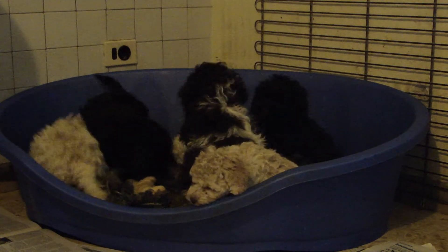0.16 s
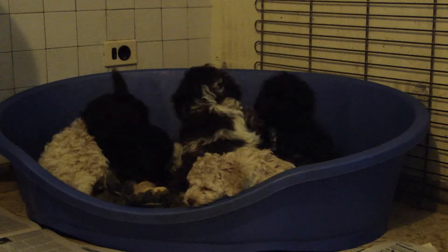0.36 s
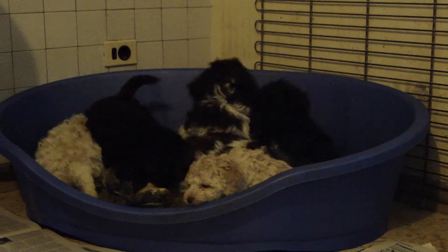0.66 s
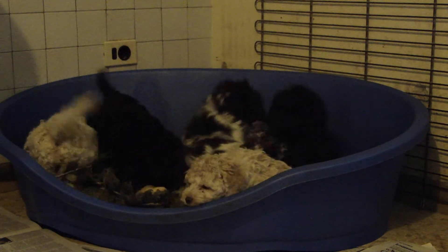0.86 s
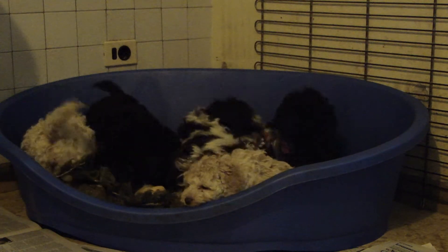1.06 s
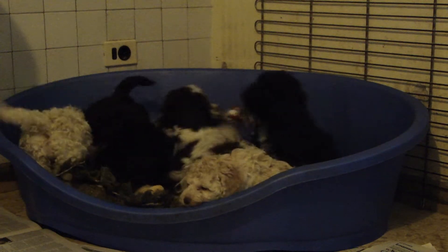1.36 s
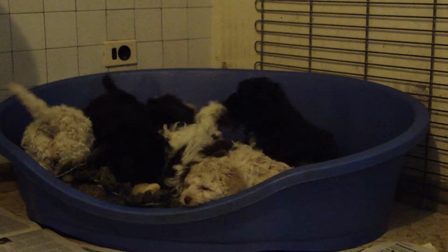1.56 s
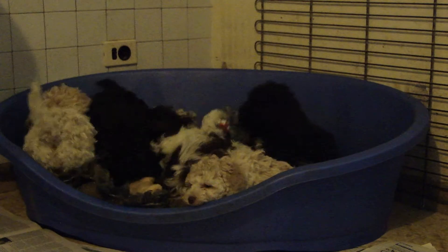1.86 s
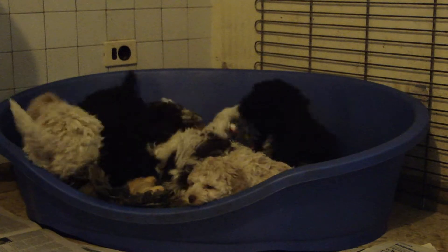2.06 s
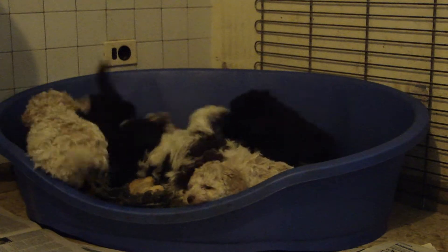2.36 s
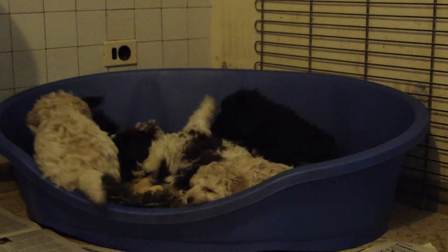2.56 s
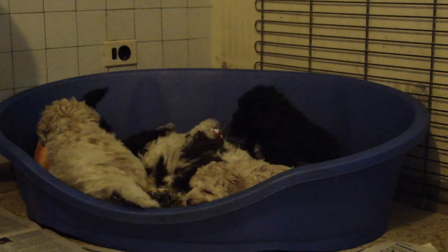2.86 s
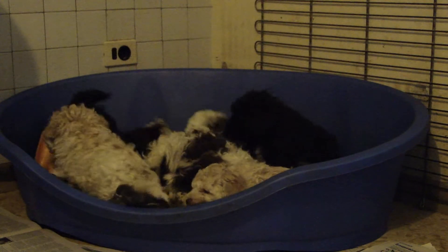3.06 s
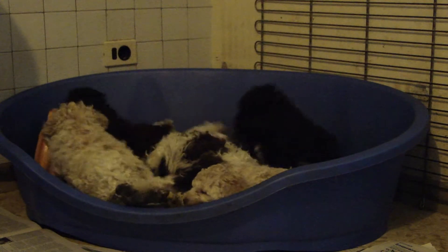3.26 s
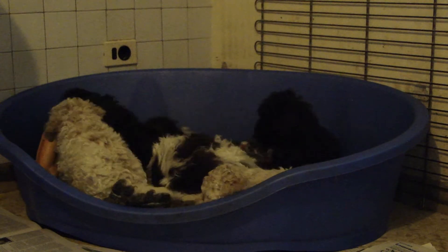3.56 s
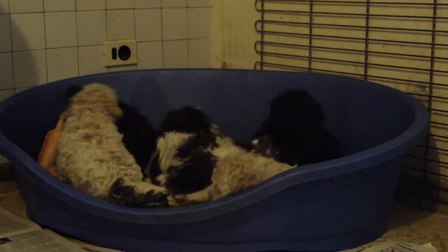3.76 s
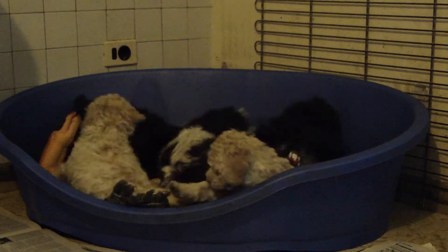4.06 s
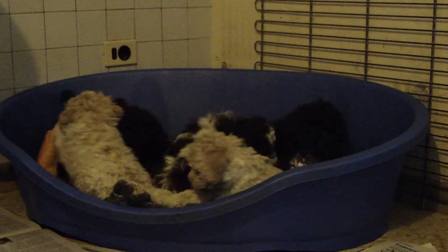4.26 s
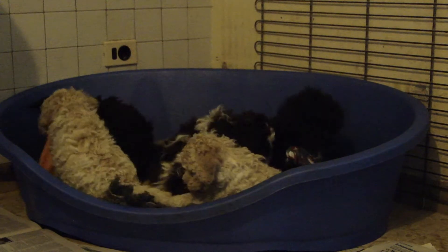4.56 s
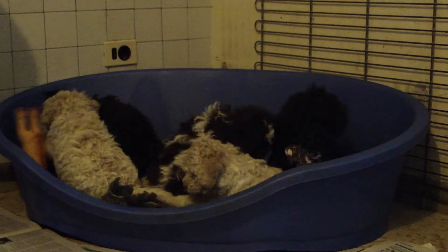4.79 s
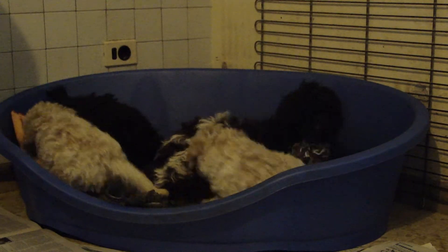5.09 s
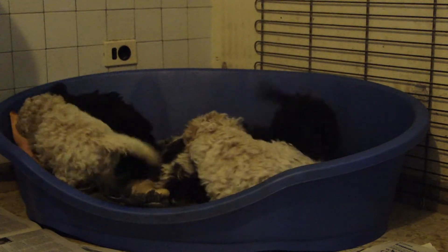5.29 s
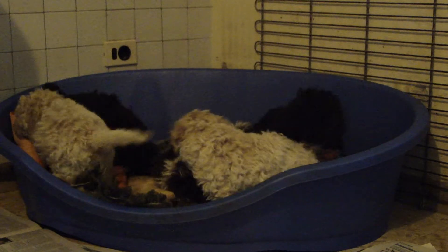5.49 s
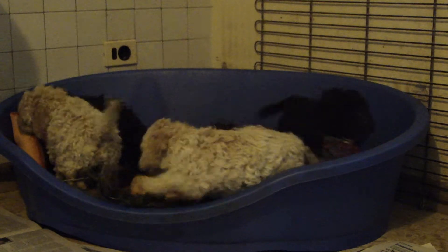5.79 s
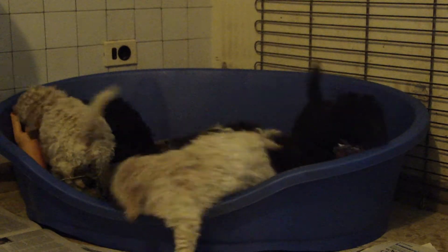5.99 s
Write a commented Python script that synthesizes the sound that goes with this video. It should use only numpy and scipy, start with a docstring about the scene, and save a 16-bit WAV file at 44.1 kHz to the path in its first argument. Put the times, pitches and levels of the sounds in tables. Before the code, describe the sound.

Puppies scuffle in a plastic bed in a small tiled room. At first a paw rakes the tub again and again, with hollow knocks and scratching claws. The scrabbling then eases into lighter shoving, rustling bedding and short snorts, with a couple of faint squeaks. Near the end come thin whimpers and more bumps and claw taps. The microphone sounds fairly near, with a short echo and soft hiss.

```python
"""A small tiled room, puppies scuffling in a plastic tub. A paw rakes the tub again and again, then the
litter shoves about. Slipping pads and knocks ring the tub's modes; claws scratch and tap the rim.
Noses snort among slower rustling swishes; throat whistles give two-toned squeaks and thin whimpers.
Under it: rustling bedding, a faint moan, a short tile echo and the room's hush."""
import sys
import numpy as np
from scipy import signal
from scipy.fft import rfft, irfft, next_fast_len
from scipy.io import wavfile
from scipy.ndimage import uniform_filter1d

SR = 44100
rng = np.random.default_rng(int(sys.argv[2]) if len(sys.argv) > 2 else 0)


def transcribe(u):
    """Save the signal u as a 16-bit wav file named by the first command-line argument.

    u: samples, shape (n,) or (channels, n), limited to [-1, 1]; the rate is SR.
    q: integer samples, one column per channel.
    """
    v = np.clip(np.atleast_2d(u).T, -1, 1)
    q = np.round(v * 32767).astype(np.int16)
    wavfile.write(sys.argv[1], SR, q)


N = 270505
T = np.arange(N) / SR

# Tub modes. Each row: frequency in Hz, width in Hz before the litter's damping, gain in dB.
TUB_MODES = [(204.4, 54, -0.5), (265.3, 30, -5.5), (294, 61, 0), (340.4, 45, 2.5), (406, 47, -6),
             (438.4, 21, -2.5), (502, 113, -3), (540.8, 15.2, -3.5), (595, 9, -2), (645, 24, 0),
             (690, 29, 0.5), (754, 17, 0), (842, 45, -8), (974, 36, 3.5), (1103, 21, -16), (1238, 12, -6),
             (1515, 112.8, -23), (1650, 120, -14.5), (2006.3, 26, -9.5), (2350, 110, -21),
             (2800, 120, -34.5)]


def paw_rakes():
    """Slipping pads shake the tub; a harder contact, or one after a rest, drives the upper modes more."""
    # Each row: time in seconds, level in dB, hold in seconds.
    contacts = [(.009, -23, 0.064), (.089, -29.5, 0.0357), (0.288, -31, 0.075), (0.386, -19, 0.05),
                (.449, -27, 0.01496), (.499, -44.5, 0.094), (0.691, -32.5, 0.034), (0.809, -20, 0.03),
                (.896, -29, 0.038), (1.063, -26.5, 0.015), (1.167, -20.5, 0.037), (1.21, -22, 0.02826),
                (1.249, -27.5, 0.017), (1.3, -44, 0.0255), (1.399, -39, 0.026), (1.459, -36, 0.00484),
                (1.558, -19.5, 0.007), (1.599, -22, 0.028), (1.634, -29, 0.037), (1.689, -44, 0.12),
                (1.837, -37, 0.0437), (1.917, -36, 0.0055), (1.996, -20, 0.0045), (2.047, -23, 0.03477),
                (2.111, -25.5, 0.014), (2.199, -35, 0.0087), (2.267, -35.5, 0.011), (2.324, -34.5, 0.04073),
                (2.446, -22, 0.017), (2.505, -25, 0.059), (2.564, -43, 0.1), (2.875, -52, 0.023),
                (3.054, -46.5, 0.04014), (3.152, -35, 0.021), (3.189, -49.5, 0.073),
                (3.309, -43.5, 0.01248), (3.38, -42.5, 0.016), (4.718, -57, 0.058), (4.838, -33, 0.019),
                (4.919, -48, 0.06865), (5.864, -39, 0.0076), (5.929, -41, 0.027), (5.987, -53, 0.0193)]
    # Weight shifting on the tub floor. Each row: time in seconds, level in dB.
    shifting = [(0.0, -21), (0.13, -41), (0.68, -47), (1.04, -35), (1.59, -43), (2.49, -52), (2.68, -83),
                (3.93, -53.5), (4.301, -65.5), (5.84, -54), (6.13, -45)]
    rise_s, upper_rise_s, bass_lag_s = 0.012494, 0.0033, 0.0022
    full_rest_s, hard_db = 0.043, -22
    lead_s = rise_s - upper_rise_s
    low_power = level_curve(shifting) ** 2
    high_power = low_power * amp(-14) ** 2
    rests_s = np.diff([row[0] for row in contacts], prepend=-1)
    for (at_s, db, hold_s), rest_s in zip(contacts, rests_s):
        upper_db = -13 + 4.5 * min(rest_s / full_rest_s, 1) + (db - hard_db)
        add(low_power, *stroke(at_s + bass_lag_s, db, rise_s + bass_lag_s, hold_s, t60_s=0.22))
        add(high_power, *stroke(at_s - lead_s, db + upper_db, upper_rise_s, hold_s + lead_s, t60_s=0.2))
    force = slips(per_s=600, spread_db=2.5, smooth=.4)
    low = ring(force * np.sqrt(low_power), TUB_MODES[:8])
    return low + ring(force * np.sqrt(high_power), TUB_MODES[7:])


def wall_knocks():
    """Short pushes ring the tub; a harder contact favours higher modes."""
    # Each row: time in seconds, push in dB, hardness in Hz.
    blows = [(0.383, -13.5, 899), (.69, -5.5, 592.4), (.799, 3, 902), (.9, 5.5, 770), (1.057, -5, 695),
             (1.156, -4, 799.5), (1.184, 10, 700), (1.36, -6.5, 800), (1.461, -4, 599.8), (1.55, 3, 898),
             (1.633, 6, 699), (1.985, 4.5, 902), (2.011, 7.5, 610), (2.116, 2.5, 593), (2.269, -16, 700),
             (2.32, -10.5, 492), (2.44, -3, 880), (2.881, -15, 701), (3.054, -16.5, 443),
             (3.145, -10, 601.2), (3.373, -23, 600), (4.549, -21, 810), (4.831, -5.5, 700),
             (5.152, -1, 600), (5.162, -7, 900), (5.525, -19, 1225), (5.545, -33, 1201), (6.085, -14, 1190)]
    force, t = np.zeros(N), np.arange(600) / SR
    for at_s, db, hz in blows:
        push = np.diff(t ** 2 * np.exp(-4 * hz * t), 2)
        add(force, round((at_s - .002) * SR), amp(db) * push / abs(rfft(push, 2048)).max())
    return ring(force, TUB_MODES)


def thuds():
    """A bump rings one patch of the tub: two fast-dying modes that sag in pitch."""
    # Each row: start in seconds, level in dB, pitch in Hz.
    bumps = [(1.92, -26, 545), (4.078, -37, 506.4), (4.104, -41, 504), (4.201, -43, 161),
             (4.548, -45.5, 748), (4.552, -46, 2170), (4.829, -30.5, 517), (4.852, -30, 578),
             (4.87, -36, 538), (4.925, -37, 503), (5.157, -22, 817), (5.173, -30, 733), (5.186, -33, 775),
             (5.201, -32, 519), (5.391, -37.5, 998.1), (5.528, -32, 790), (5.53, -31.5, 1593),
             (5.663, -38, 575), (5.751, -38.5, 1434), (5.862, -30, 390.4), (5.873, -31.5, 209),
             (5.877, -42, 2310), (5.986, -29.5, 209), (6.041, -39.5, 178)]
    # Each row: frequency ratio, gain in dB.
    patch_modes = [(1., 4), (1.15, -6.5)]
    rise_s, t60_s = 0.0031, 0.08
    out, t = np.zeros(N), np.arange(SR // 6) / SR
    for start_s, db, hz in bumps:
        phase = 2 * np.pi * hz * t * (1 - 0.83 * t)
        pair = sum(amp(mode_db) * np.sin(ratio * phase) for ratio, mode_db in patch_modes)
        add(out, round(start_s * SR), amp(db - 60 * t / t60_s) * pair * ramp(t, rise_s))
    return out


def claw_scratches():
    """A claw slips over the rim: a run of ticks through one broad resonance."""
    # Each row: time in seconds, level in dB, resonance in Hz.
    scratches = [(.0094, -30.5, 1194), (0.383, -29, 1090), (0.69, -38.5, 1397), (0.748, -37, 1500),
                 (0.799, -27, 988.8), (0.9, -28.5, 1360), (.9324, -46, 1488), (1.163, -38, 1850),
                 (1.2485, -38, 1014), (1.556, -40, 1080), (1.631, -36, 1097), (1.993, -34.5, 1090),
                 (2.0686, -40, 985), (2.444, -30.5, 890), (2.5635, -42, 1117), (3.998, -44, 1590),
                 (4.203, -52, 900), (4.551, -48, 1120), (4.7195, -48.5, 600), (4.76, -50, 700),
                 (5.153, -49, 940), (5.299, -39.5, 880), (5.341, -38, 1420), (5.379, -41.5, 1779),
                 (5.521, -33, 1060), (5.611, -40, 1400), (5.6594, -62, 1378), (5.8743, -46.5, 2400),
                 (5.9095, -46.5, 2632), (6.086, -35, 980)]
    force = slips(per_s=1100, spread_db=3, smooth=0.48)
    out, t = np.zeros(N), np.arange(400) / SR
    for at_s, db, hz in scratches:
        start, power = stroke(at_s, db, rise_s=0.0055, hold_s=0.0083, t60_s=0.31)
        resonance = np.exp(-np.pi * .7 * hz * t) * np.sin(2 * np.pi * hz * t)
        tick = np.diff(resonance, prepend=0)  # too small to carry bass
        tick = np.convolve(tick, np.hanning(9))  # finite tip dulls the edge
        drive = force[start:start + len(power)]
        drive = drive * np.sqrt(power[:len(drive)])
        add(out, start, signal.oaconvolve(drive, tick / np.linalg.norm(tick)))
    return out


def claw_taps():
    """A claw tip strikes the rim: a snap of a few rough cycles."""
    # Each row: start in seconds, level in dB, ring in Hz.
    taps = [(0.7965, -23, 3140), (0.7965, -41, 11500), (0.9331, -27.5, 4380), (1.911, -34, 8140),
            (2.5647, -28.5, 10800), (2.565, -31, 4200), (3.3693, -40, 8900), (4.9, -32, 10500),
            (5.213, -33, 11100), (5.5247, -30.5, 3460), (5.611, -39, 3000), (5.619, -36, 3480),
            (5.876, -33, 3500)]
    decay_s = 0.0009
    out, t = np.zeros(N), np.arange(300) / SR
    for start_s, db, hz in taps:
        rough = 1 + 0.82 * uniform_filter1d(rng.standard_normal(len(t)), size=5)
        snap = rough * np.sin(2 * np.pi * hz * t) * np.exp(-t / decay_s)
        add(out, round(start_s * SR), amp(db) * snap)
    return out


def snorts_and_swishes():
    """Abrupt snorts and slower rustling swishes; the longer held, the hissier."""
    # Each row: time in seconds, level in dB, rise in seconds, hold in seconds.
    bursts = [(.01, -34.5, 0.067, 0.0015), (.17, -41, 0.1045, 0.0039), (.45, -41.5, 0.0599, 0.048),
              (.77, -41, 0.17, 0.0017), (.797, -33, 0.01818, 0.0045), (1.6, -55, 0.091, 0.03953),
              (1.911, -34.5, 0.016, 0.007), (2.065, -53, 0.00627, 0.0183), (2.447, -44.5, 0.0017, 0.027),
              (2.557, -41.5, 0.0045, 0.016), (3.145, -51.5, 0.016, 0.045), (3.218, -45, 0.00722, 0.01855),
              (3.371, -39.5, 0.004556, 0.023), (3.99, -48, 0.018, 0.0063), (4.827, -45, 0.0081, 0.011),
              (4.893, -37, 0.006434, 0.015), (5.104, -48.5, 0.00583, 0.012), (5.153, -58, 0.00768, 0.0585),
              (5.208, -42.5, 0.011, 0.0116), (5.36, -43.5, 0.019, 0.012), (5.749, -36, 0.0073, 0.05),
              (5.799, -39, 0.00524, 0.0078), (5.875, -40.5, 0.0056, 0.019), (5.94, -46, 0.014, 0.00903),
              (6.084, -49, 0.0068, 0.016)]
    # Broad and hissy spectra. Each row: frequency in Hz, spectral density in dB.
    broad_spectrum = [(530, -12), (900, 9), (985, 6), (1430, 4.5), (1570, 6), (4710, 3), (10600, -17.5),
                      (12300, -24.5), (13500, -85)]
    hiss_spectrum = [(2500, -32), (5000, -17.5), (7500, -2.5), (10500, 0.5), (12300, 0), (13500, -57)]
    broad_power, hiss_power = np.zeros((2, N))
    for at_s, db, rise_s, hold_s in bursts:
        hiss_share = min(10.4 * hold_s, 1)
        start, power = stroke(at_s, db, rise_s, hold_s, t60_s=0.21)
        add(broad_power, start, power * (1 - hiss_share))
        add(hiss_power, start, power * hiss_share)
    noise = slips(per_s=2500, spread_db=2.5, smooth=.75)
    broad = shaped(noise, broad_spectrum) * np.sqrt(broad_power)
    return broad + shaped(noise, hiss_spectrum) * np.sqrt(hiss_power)


def squeak(start_s, climb_s, hold_s, from_hz, top_hz, end_hz, steady_hz,
           db, steady_db, lock_s, yield_db, sum_db):
    """Two whistles in one throat: one climbs, one joins; locked, they add difference and sum tones."""
    # Each row: multiple of the gliding pitch, of the steady pitch, extra fall in dB, delay in seconds.
    mixed_tones = [(2, -1, -41, 0.), (1, 1, 0.5, 0.017)]
    fall_s, sag, difference_db, octave_db, breath_hz = 0.046, 0.029, 4.5, -5.5, (2474, 8900)
    t = np.arange(0, climb_s + hold_s + fall_s, 1 / SR)
    up, down = ramp(t, climb_s), ramp(t - climb_s - hold_s, fall_s)
    joined = ramp(t - 0.68 * climb_s, .01)
    glide_hz = top_hz - (top_hz - from_hz) * (1 - up) ** 1.3 - (top_hz - end_hz) * down
    sagged_hz = steady_hz * (1 - sag * (1 - up + down))
    level_db = db - 14.5 * down ** 2
    swell_db = level_db - 6 * (1 - up) ** 4
    glide_phase, glide_amp = whistle(glide_hz, swell_db, jitter=.007, flicker_db=5, span_s=.003)
    steady_phase, steady_amp = whistle(sagged_hz, level_db, jitter=.008, flicker_db=5, span_s=.003)
    breath = butterworth(rng.standard_normal(len(t)), "bandpass", breath_hz, order=2)
    rasp_rad = .8
    glide = np.sin(glide_phase + rasp_rad * wobble(len(t), span_s=0.0013))
    steady = np.sin(steady_phase + rasp_rad * wobble(len(t), span_s=0.00069))
    out = glide_amp * (amp(yield_db * joined) * glide + amp(octave_db) * up * np.sin(2 * glide_phase))
    out += amp(steady_db) * steady_amp * joined * steady
    for (m, n, fall_db, delay_s), tone_db in zip(mixed_tones, (difference_db, sum_db)):
        locked = ramp(t - lock_s - delay_s, .01)
        tone = np.sin(m * glide_phase + n * steady_phase)
        out += amp(tone_db + fall_db * down) * steady_amp * locked * tone
    return round(start_s * SR), out + amp(level_db + 1) * up * unit_rms(breath)


def whimper(contour):
    """One whistle, raspier and breathier as its pitch is forced up."""
    start, (hz, db) = curves(contour)
    strain = np.minimum(hz / 3000, 1.8)
    phase, level = whistle(hz, db, jitter=.05 * strain, flicker_db=4.5, span_s=.0008)
    breath = amp(-20) * strain ** 3 * wobble(len(hz), span_s=.0003)
    return start, level * (np.sin(phase) + breath * np.cos(phase))


def high_calls():
    """The litter's throat whistles: squeaks and whimpers."""
    # Each row: the arguments of squeak(), in order; steady, yield and sum dB are relative to the level.
    squeaks = [(2.785, .13, 0.062, 2127, 4440, 3706, 2644, -58.5, 1.5, 0.125, -4, 2),
               (3.825, 0.055, 0.023, 3200, 4564, 4400, 2827, -49.5, 1.5, 0.034, -3, -19)]
    # One contour a whimper. Each row: time in seconds, pitch in Hz, level in dB.
    whimpers = [
        [(.215, 2750, -56), (.26, 2700, -54), (.3, 2700, -58)],
        [(5.025, 2688, -48), (5.05, 3109, -49), (5.078, 3266, -51), (5.11, 3036, -49), (5.135, 3037, -52),
         (5.155, 2929, -43)],
        [(5.152, 5468, -40.5), (5.165, 5150, -43), (5.18, 4850, -38), (5.195, 4150, -48), (5.215, 3651, -43.5),
         (5.245, 3200, -44.5), (5.28, 3163, -61)],
        [(5.15, 5780, -41), (5.163, 6020, -38), (5.185, 6310, -46)],
        [(5.153, 7700, -55), (5.172, 7873, -48), (5.19, 7575, -43)],
        [(5.43, 2723, -62), (5.45, 2690, -53), (5.49, 2598, -54), (5.51, 2529, -67)],
    ]
    out = np.zeros(N)
    for row in squeaks:
        add(out, *squeak(*row))
    for contour in whimpers:
        add(out, *whimper(contour))
    return out


def moan():
    """A faint low hum of three harmonics, the third strongest."""
    # Each row: time in seconds, pitch in Hz, level in dB.
    contour = [(3.45, 200.2, -67), (3.782, 183.5, -64), (4.1, 216, -71)]
    start, (hz, db) = curves(contour)
    phase, level = whistle(hz, db, jitter=.025, flicker_db=3, span_s=.03)
    harmonics = np.sin(phase) + amp(0.5) * np.sin(2 * phase) + amp(3.5) * np.sin(3 * phase)
    out = np.zeros(N)
    add(out, start, level * harmonics)
    return out


def bedding():
    """Fine crackle that swells with the wriggling."""
    # Each row: time in seconds, level in dB.
    wriggling = [(0.0, -42), (0.97, -47.5), (1.71, -58), (4.58, -61), (5.26, -49), (6.13, -65)]
    # Each row: frequency in Hz, spectral density in dB.
    spectrum = [(700, -17), (1500, -3), (2800, -6), (5000, -13.5), (9000, -19.5), (13500, -23)]
    return shaped(slips(per_s=3100, spread_db=1, smooth=0.78), spectrum) * level_curve(wriggling)


def floor_bass(drive):
    """The boards under the tub pass on a little deep bass."""
    # Each row: frequency in Hz, width in Hz before the litter's damping, gain in dB.
    board_modes = [(150, 12.6, 0)]
    return amp(-49) * ring(drive, board_modes)


def tiled_room(x, t60_s, wet_db):
    """A short, diffuse stereo echo, crossfaded among several tails."""
    # Each row: frequency in Hz, left-right correlation.
    correlation = [(60, 1), (180, 0.96), (520, 0.96), (1540, 0.45), (4540, -0.28), (13400, -0.12)]
    t, parts = np.arange(SR // 4) / SR, crossfaded(x)
    tails = rng.standard_normal((2, len(parts), len(t))) * amp(-60 * t / t60_s) * (t > .002)
    tails /= np.linalg.norm(tails, axis=2, keepdims=True)
    mid_tail, side_tail = signal.oaconvolve(parts[None], tails, axes=2).sum(axis=1)[:, :N]
    wet = amp(wet_db)
    blend = (x + wet * mid_tail) / np.sqrt(1 + wet ** 2)
    mid = coloured(blend, lambda hz: np.sqrt((1 + at_hz(correlation, hz)) / 2))
    side = coloured(side_tail, lambda hz: np.sqrt((1 - at_hz(correlation, hz)) / 2))
    return np.array([mid + side, mid - side])


def hush():
    """Still room air and microphone hiss, faintly patchy."""
    # Each row: frequency in Hz, spectral density in dB.
    spectrum = [(15, -70), (30, -50), (62, -85.5), (96, -4.5), (270, -3), (400, 4.5), (558, 4.5),
                (637, 2.5), (1080, 0.5), (1260, -0.5), (1870, -3.5), (2780, -8), (10700, -19),
                (12200, -20.5), (13500, -62.5)]
    # Each row: frequency in Hz, left-right correlation.
    correlation = [(60, 0.39), (230, -0.084), (900, -0.18), (3470, -0.19), (13400, -0.092)]
    frames, hz = N // 256 + 5, np.fft.rfftfreq(1024, 1 / SR)
    left_re, left_im, other_re, other_im, patches = rng.standard_normal((frames, 513, 5)).T
    patch_db = unit_rms(uniform_filter1d(uniform_filter1d(patches, 14, axis=0), 12, axis=1))
    alike = at_hz(correlation, hz)[:, None]
    left = left_re + 1j * left_im
    right = alike * left + np.sqrt(1 - alike ** 2) * (other_re + 1j * other_im)
    bins = np.array([left, right]) * amp(at_hz(spectrum, hz)[:, None] + patch_db)
    _, noise = signal.istft(bins, nperseg=1024, noverlap=768)
    return amp(-48.5) * unit_rms(noise[:, :N])


def slips(per_s, spread_db, smooth):
    """Stick-slip friction: sparse uneven jolts over rubbing noise with power share `smooth`."""
    size = amp(spread_db * np.minimum(rng.exponential(1, N), 4)) * rng.choice([-1., 1.], N)
    jolts = size * (rng.random(N) < per_s / SR)
    return np.sqrt(1 - smooth) * unit_rms(jolts) + np.sqrt(smooth) * rng.standard_normal(N)


def ring(drive, modes):
    """Damped modes whose pitch and strength vary from one contact spot to the next."""
    detune, spread_db, damping = .04, 2.5, 1.35  # the litter's weight widens the modes
    t, out = np.arange(SR // 5) / SR, np.zeros(N)
    for part in crossfaded(drive):
        response = np.zeros(len(t))
        for hz, width_hz, db in modes:
            gain_draw, pitch_draw = rng.standard_normal(2)
            decay = np.sqrt(width_hz) * np.exp(-np.pi * damping * width_hz * t)
            tone = np.sin(2 * np.pi * hz * (1 + detune * pitch_draw) * t)
            response += amp(db + spread_db * gain_draw) * decay * tone
        out += signal.oaconvolve(part, response / np.linalg.norm(response))[:N]
    return out


def crossfaded(x, count=6, step_s=.09):
    """Split x into parts that take turns at constant power."""
    place = (T / step_s - np.arange(count)[:, None]) % count - 1
    return x * np.cos(np.pi / 2 * np.clip(place, -1, 1))


def whistle(hz, db, jitter, flicker_db, span_s):
    """Phase and amplitude of a tone whose pitch and strength shake."""
    phase = 2 * np.pi * np.cumsum(hz * (1 + jitter * wobble(len(hz), span_s))) / SR
    level = np.sqrt(2) * amp(db + flicker_db * wobble(len(hz), 2 * span_s))
    return phase, level * signal.windows.tukey(len(hz), .1)


def stroke(at_s, db, rise_s, hold_s, t60_s):
    """Start sample and power envelope: rise ending at at_s, hold, exponential fade."""
    t = np.arange(-rise_s, hold_s + t60_s, 1 / SR)
    power = ramp(t + rise_s, rise_s) * amp(db - 60 * np.maximum(t - hold_s, 0) / t60_s) ** 2
    start = round((at_s - rise_s) * SR)
    return max(start, 0), power[max(-start, 0):]


def curves(rows):
    """Start sample and per-sample columns of a contour."""
    times_s, *columns = np.transpose(rows)
    t = np.arange(times_s[0], times_s[-1], 1 / SR)
    return round(times_s[0] * SR), [np.interp(t, times_s, column) for column in columns]


def level_curve(rows):
    return amp(np.interp(T, *np.transpose(rows)))


def wobble(length, span_s):
    """Smoothed noise, rms 1."""
    return unit_rms(uniform_filter1d(rng.standard_normal(length), round(span_s * SR)))


def coloured(x, gain):
    """Filter by a gain given as a function of Hz."""
    size = next_fast_len(N + SR)
    return irfft(rfft(x, size) * gain(np.fft.rfftfreq(size, 1 / SR)), size)[..., :N]


def shaped(x, spectrum):
    """Filter by (Hz, dB) points, then scale to rms 1."""
    return unit_rms(coloured(x, lambda hz: amp(at_hz(spectrum, hz))))


def at_hz(points, hz):
    points_hz, values = np.transpose(points)
    return np.interp(np.log(hz + 1), np.log(points_hz + 1), values)


def butterworth(x, kind, hz, order):
    return signal.sosfilt(signal.butter(order, hz, kind, fs=SR, output="sos"), x)


def ramp(t, rise_s):
    return np.clip(t / rise_s, 0, 1)


def amp(db):
    return 10 ** (np.asarray(db) / 20)


def unit_rms(x):
    return x / np.sqrt(np.mean(x ** 2) + 1e-20)


def add(mix, start, sound):
    part = mix[start:][:len(sound)]
    part += sound[:len(part)]


def scene():
    """The tub stands slightly right and is too small to radiate deep bass."""
    calls, hum, taps = high_calls(), moan(), claw_taps()
    litter = paw_rakes() + wall_knocks() + claw_scratches() + amp(-8) * taps
    litter += bedding() + snorts_and_swishes() + calls
    radiated = butterworth(litter, "highpass", hz=226, order=8)
    lows = floor_bass(litter) + butterworth(thuds(), "highpass", hz=138, order=3) + hum
    lows = butterworth(lows, "highpass", hz=115, order=5)
    stereo = tiled_room(radiated + lows, t60_s=0.17, wet_db=-3.5)
    stereo += amp(-1.5) * taps  # heard mostly direct
    balance_db = [[-.6], [.6]]
    return stereo * amp(balance_db) + hush()


def record(dry):
    """Steep treble cut near 12 kHz, then a band limit."""
    treble_top_hz, band_edge_hz = 12070, 13900
    rolled = coloured(dry, lambda hz: 1 / np.sqrt(1 + (hz / treble_top_hz) ** 41))
    lowpass = signal.firwin(511, band_edge_hz, window=("kaiser", 9), fs=SR)
    return signal.oaconvolve(rolled, lowpass[None], "same")


dry = scene()
out = record(dry)
transcribe(out)
```